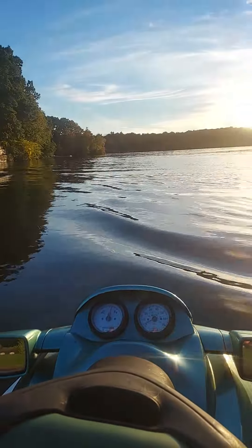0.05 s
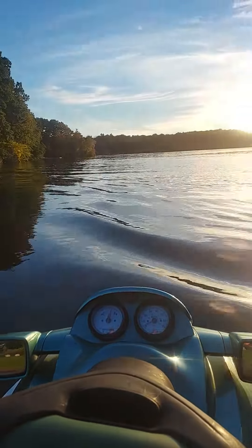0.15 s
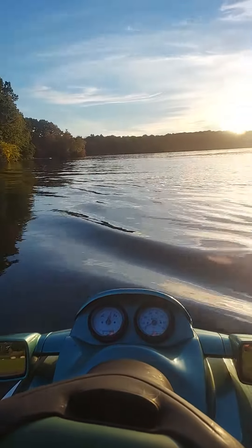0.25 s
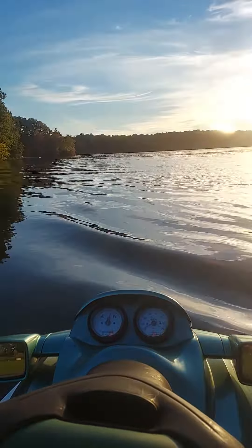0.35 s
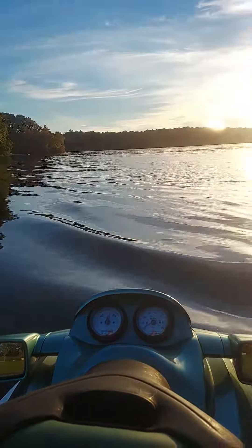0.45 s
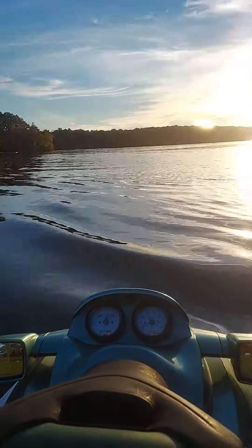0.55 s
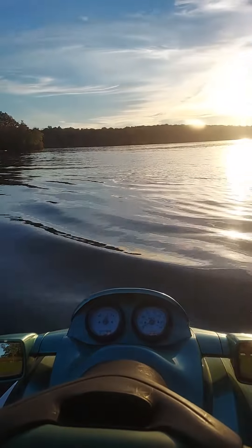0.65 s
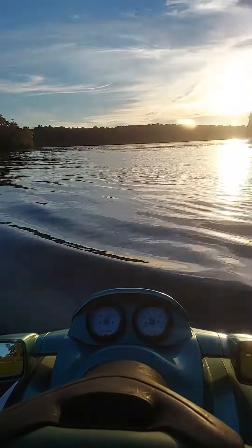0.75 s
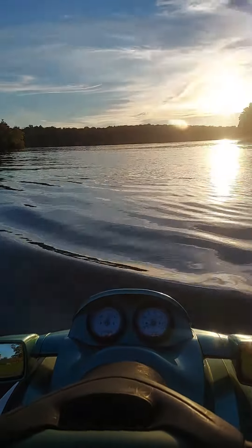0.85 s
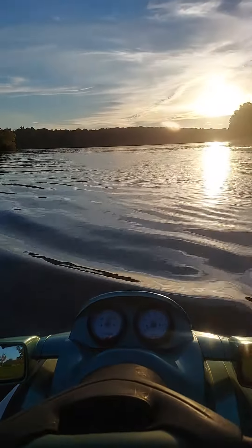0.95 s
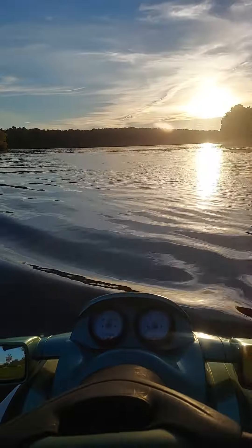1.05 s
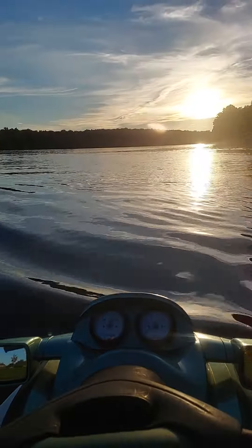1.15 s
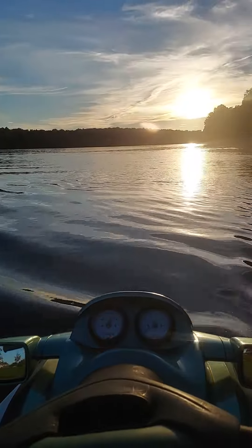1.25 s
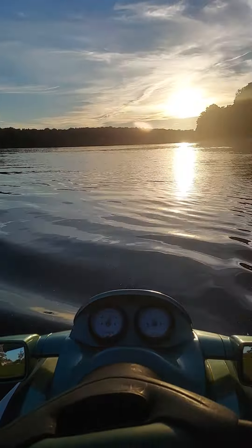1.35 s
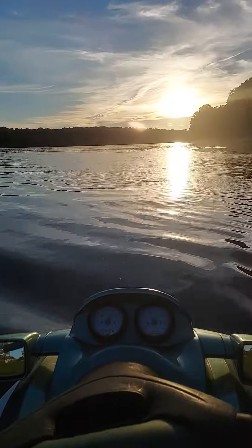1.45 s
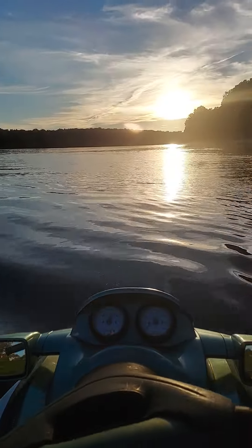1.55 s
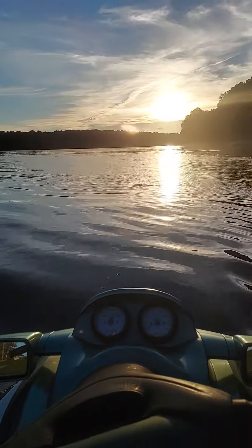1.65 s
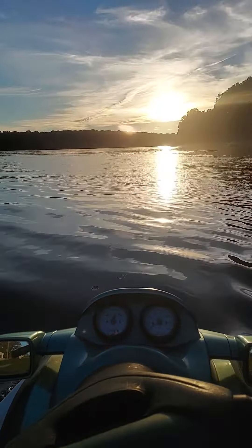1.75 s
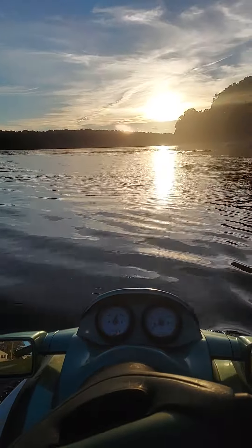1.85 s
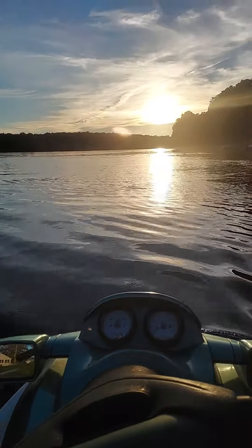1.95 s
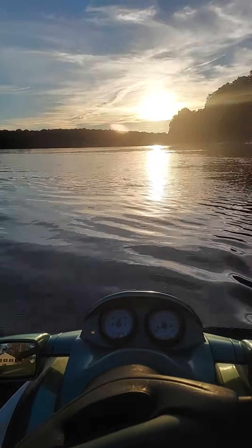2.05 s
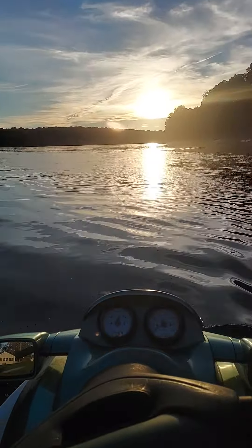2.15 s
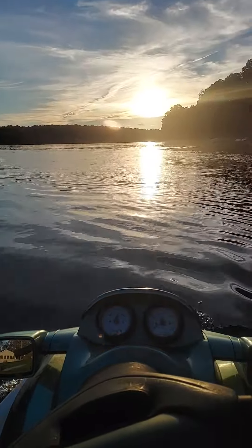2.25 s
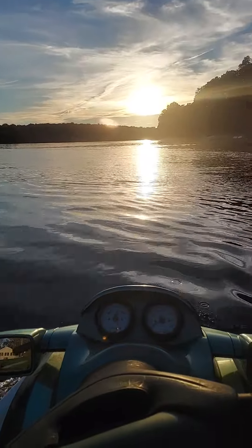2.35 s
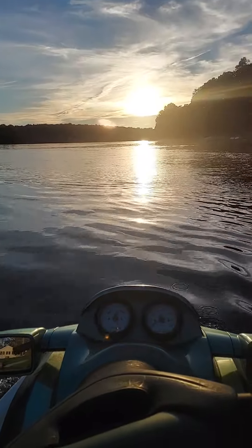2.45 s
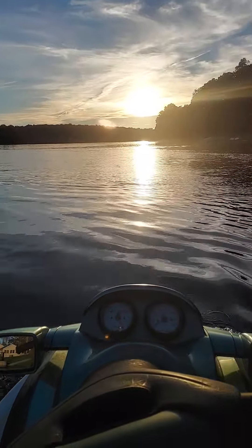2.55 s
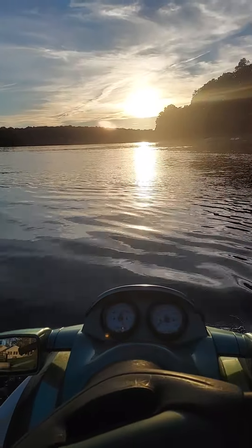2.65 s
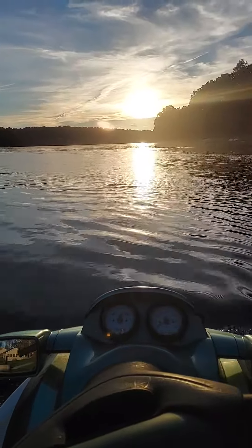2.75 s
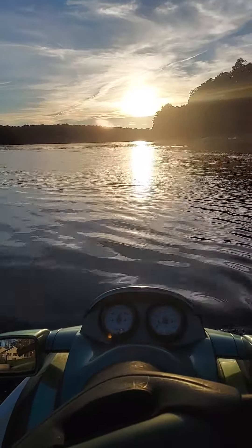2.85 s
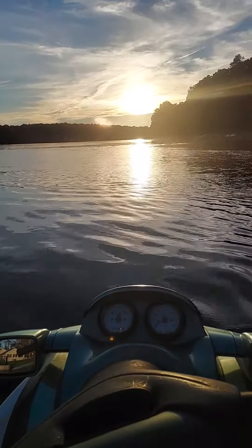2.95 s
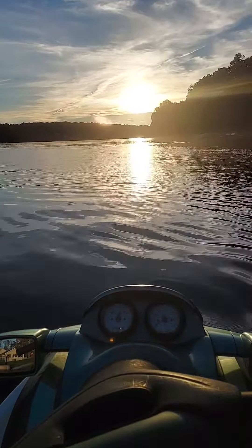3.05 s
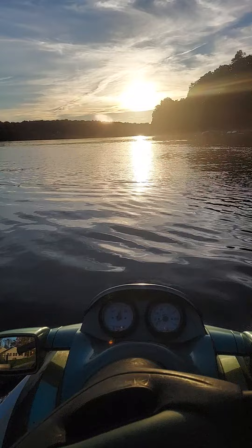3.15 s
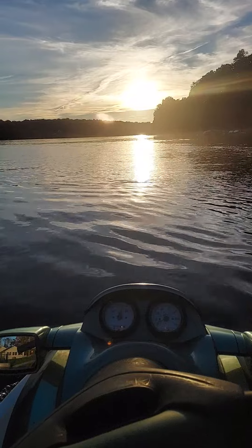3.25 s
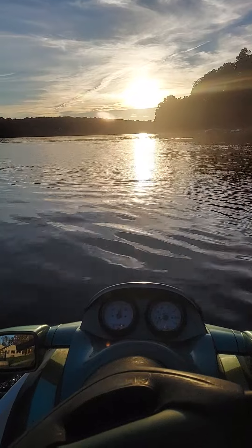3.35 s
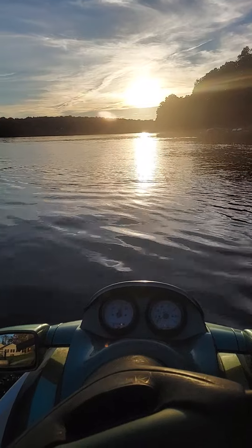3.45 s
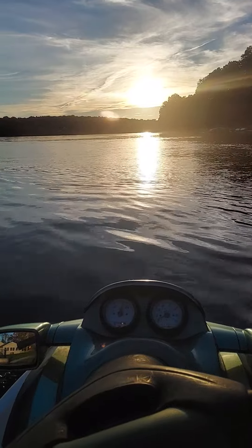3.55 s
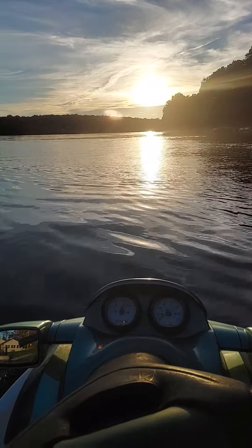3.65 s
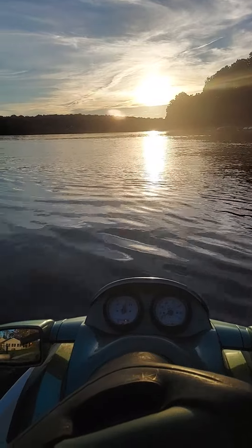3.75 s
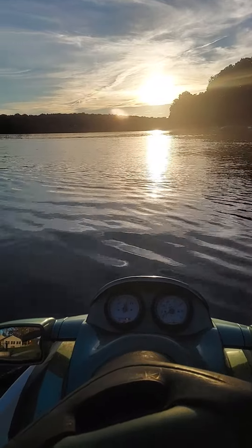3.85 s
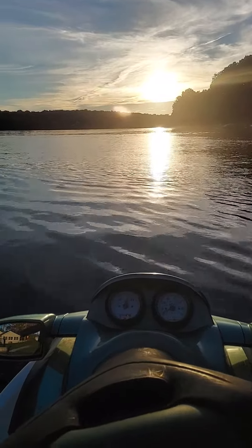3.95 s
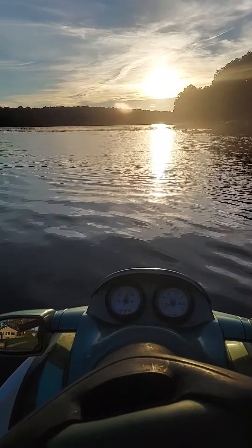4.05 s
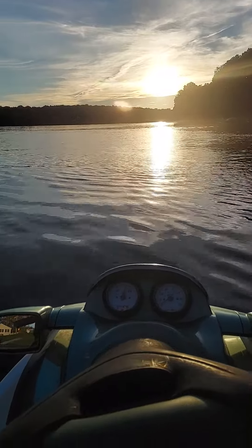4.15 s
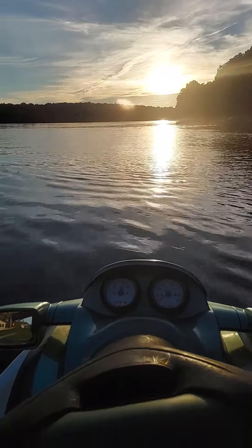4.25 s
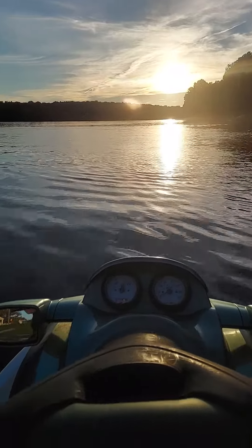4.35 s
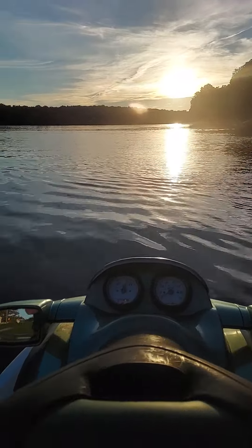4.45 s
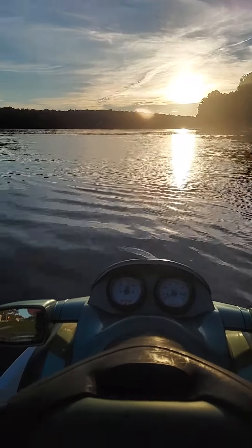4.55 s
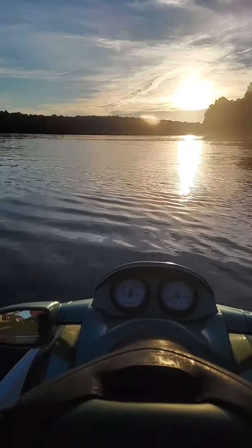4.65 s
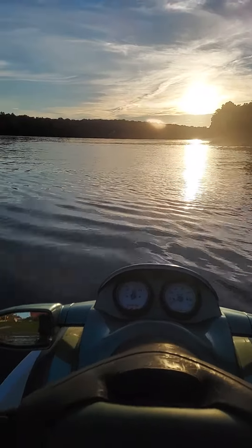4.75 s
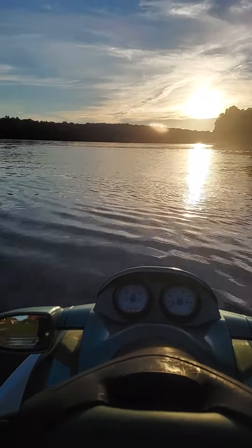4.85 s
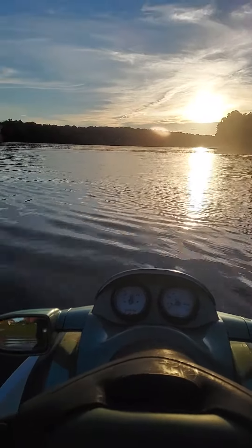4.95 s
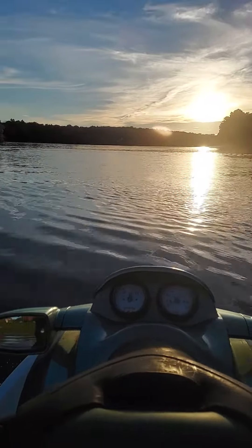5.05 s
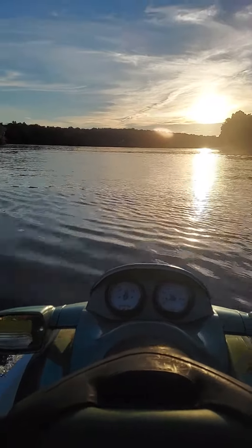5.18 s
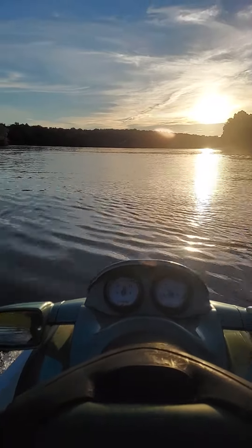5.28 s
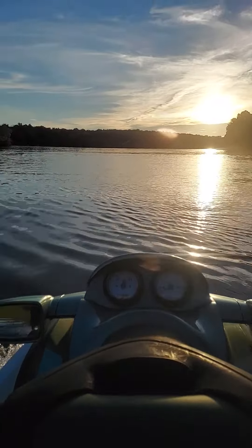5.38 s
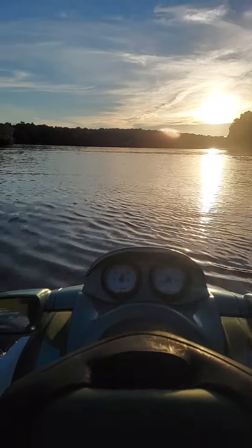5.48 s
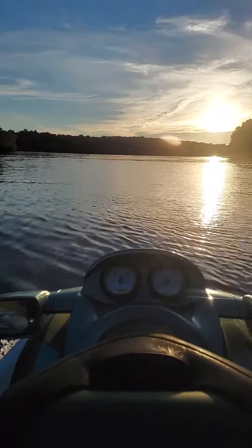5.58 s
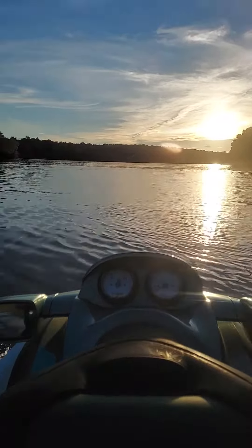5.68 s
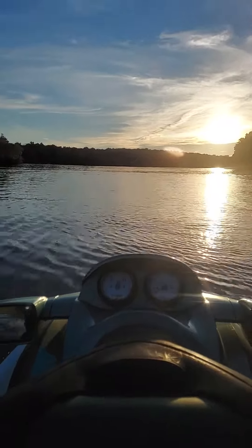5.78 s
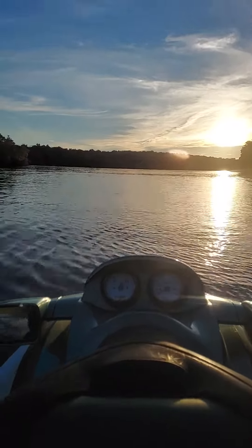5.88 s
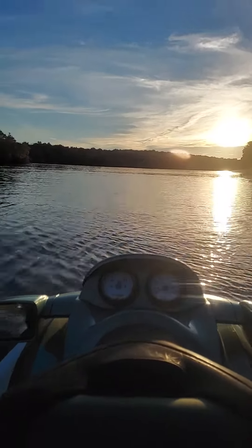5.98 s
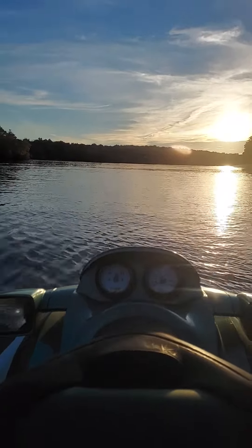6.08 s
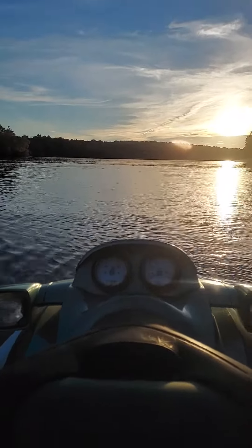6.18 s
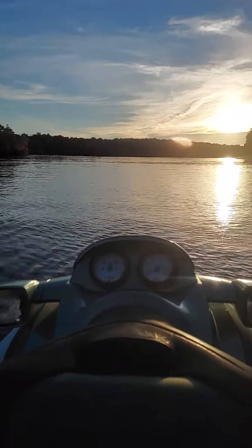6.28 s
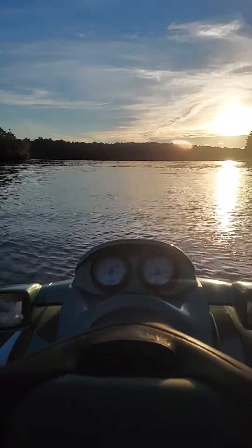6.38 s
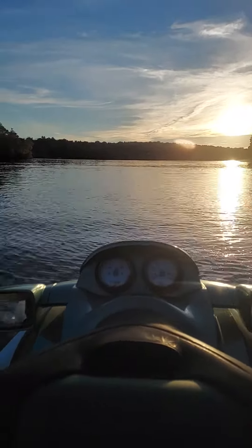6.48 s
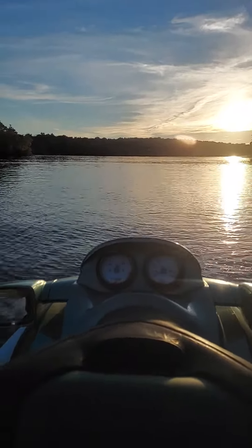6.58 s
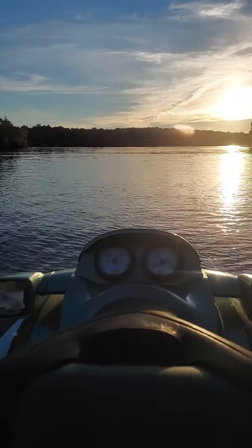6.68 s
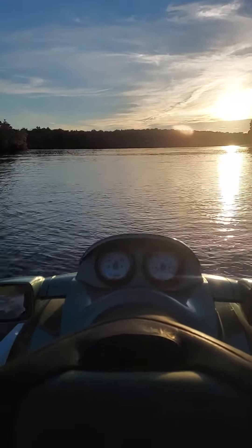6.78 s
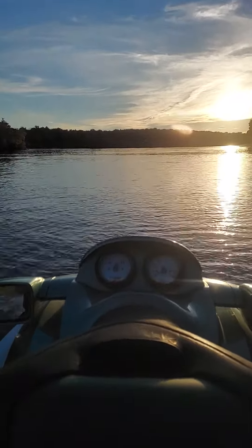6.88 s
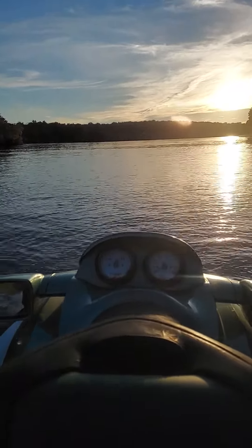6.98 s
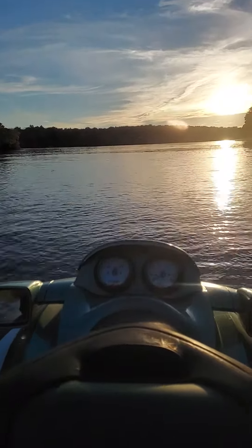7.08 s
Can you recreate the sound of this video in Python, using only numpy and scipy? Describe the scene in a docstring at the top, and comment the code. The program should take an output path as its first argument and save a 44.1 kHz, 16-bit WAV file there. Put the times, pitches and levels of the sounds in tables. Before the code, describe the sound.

A small watercraft idles with wet, uneven exhaust burbles and lapping water, then throttles up in two steps to a steady, higher drone.

```python
"""An idling watercraft burbles in burps at the waterline, its engine clattering while water laps the hull;
then the throttle opens and the note climbs in two steps to a steady drone over churning jet and growing hiss.
Exhaust and whine are sums of shaft orders shaped by the resonances of pipe and hull. Clatter, jet and spray
are shaped noise; bubbles and slaps are short tones rising in pitch. The lake is calm, heard from the saddle."""
import sys
import numpy as np
from scipy import signal
from scipy.fft import rfft, irfft, next_fast_len
from scipy.io import wavfile
from scipy.ndimage import map_coordinates

SR = 44100
rng = np.random.default_rng(int(sys.argv[2]) if len(sys.argv) > 2 else 0)


def pcm_store(signal):
    """Save signal as 16-bit PCM."""
    levels = np.round(np.clip(np.atleast_2d(signal), -1, 1) * 32767)
    wavfile.write(sys.argv[1], SR, levels.astype(np.int16).T)


N = 313992

# colour of the hull at idle, for clatter and splashes: f/Hz, relative density/dB
HULL_AT_IDLE = [(350, -36), (600, -5.5), (730, -1), (810, -4.5), (890, -2), (1020, -4), (1290, -5),
                (1400, -9), (1700, -1), (1850, -6), (2050, -12), (2500, -16.5), (3050, -20.5),
                (3500, -34.5), (3950, -28), (4500, -53), (6700, -100)]


def amp(db):
    """Decibels to gain."""
    return 10 ** (np.asarray(db) / 20)


def unit(x):
    """Scaled to rms 1."""
    return x / np.sqrt(np.mean(x ** 2) + 1e-20)


def along(points, hz):
    """Points of f/Hz and value, read on a log frequency axis."""
    f, v = np.transpose(points)
    return np.interp(np.log(hz + 1), np.log(f + 1), v)


def clock():
    """The time of every sample, in seconds."""
    return np.arange(N) / SR


def curves(rows):
    """One value per sample for each column after the time."""
    s, *cols = np.transpose(rows)
    return [np.interp(clock(), s, c) for c in cols]


def wobble(rate):
    """A smooth random curve, rate knots a second."""
    knots = rng.standard_normal(int(N * rate / SR) + 4)
    return map_coordinates(knots, [clock() * rate])


def filtered(x, response):
    """x shaped by a complex response of frequency."""
    m = next_fast_len(N + SR // 2)
    return irfft(rfft(x, m) * response(np.fft.rfftfreq(m, 1 / SR)), m)[..., :N]


def noise(spectrum):
    """Stereo noise, alike in the bass and diffuse in the treble; its middle has rms 1."""
    # likeness of the two channels: f/Hz, correlation
    likeness = [(50, 0.99), (100, 0.96), (450, 0.99), (750, 0.84), (1200, 1), (1700, 0.34), (2200, .05),
                (5000, .05)]

    def mid_and_side(hz):
        angle = np.arccos(np.clip(along(likeness, hz), 0, 1)) / 2
        return amp(along(spectrum, hz)) * [np.cos(angle), np.sin(angle)]

    mid, side = filtered(rng.standard_normal((2, N)), mid_and_side)
    return np.array([mid + side, mid - side]) / np.std(mid)


def bursts(events, t60, rise):
    """An envelope that rises at each event (t/s, level/dB) and dies away by 60 dB in t60 seconds."""
    rows = np.array(events)
    age = np.maximum(clock() - rows[:, :1], 0)
    return np.sum((1 - np.exp(-age / rise)) * amp(rows[:, 1:2] - 60 * age / t60), axis=0)


def handlebar_ticks():
    """Small ticks at the handlebar: very short bursts of bright noise."""
    # ticks: t/s, relative level/dB
    tick_times = [(0.454, -52), (1.1961, -50.5), (1.8386, -40.5), (3.4769, -47), (4.7117, -46.5)]
    # their colour: f/Hz, relative density/dB
    tick_colour = [(2000, -30), (4500, -8), (5600, 0), (8000, -16), (10000, -5.5), (12000, -5),
                   (15700, -11.5)]
    return bursts(tick_times, t60=.009, rise=.0004) * noise(tick_colour)


def bubbles(pitch_hz, spread, cycles, level_db, count):
    """Small bubbles plop along the hull: decaying sines, rising in pitch, scattered over the first 4.4 s."""
    t, out = np.arange(SR // 10) / SR, np.zeros(N + SR)
    for when, pitch, size in zip(rng.random(count), rng.standard_normal(count), rng.random(count)):
        hz = pitch_hz * np.exp(spread * np.clip(pitch, -2, 2))
        age = t * hz / cycles
        tone = np.sin(2 * np.pi * hz * t * (1 + 0.035 * age))
        plop = tone * np.exp(-3 * age) * (1 - np.exp(-30 * age))
        start = int(when * 4.4 * SR)
        out[start:][:len(t)] += amp(level_db - 14 * size) * plop
    return out[:N]


def slaps(cycles, plop_db, splash_db):
    """Each slap traps a pocket of air that rings briefly, rising in pitch, inside a soft splash."""
    # water slaps on the hull: t/s, relative level/dB, starting pitch f/Hz, t60 of the splash/s
    hits = [(0.126, -24.5, 700, 0.037), (.744, -23.5, 683, .04), (.96, -25, 1280, .12),
            (1.284, -21.5, 1494, .07), (1.393, -26, 1660, .12), (1.515, -24, 1754, .08),
            (1.797, -25.5, 1583, .1), (1.974, -25.5, 1074, .25), (2.006, -22, 554, .1),
            (2.342, -22, 1113, .06), (2.366, -26, 1670, 0.27), (3.148, -26, 1590, .15),
            (3.476, -23.5, 1705, 0.088), (3.649, -24, 1615, .1), (4.449, -17.5, 993, 0.087)]
    t, out = np.arange(SR // 10) / SR, np.zeros(N + SR)
    for s, db, hz, _ in hits:
        age = t * hz / cycles
        tone = np.sin(2 * np.pi * hz * t * (1 + 0.033 * age))
        pocket = tone * np.exp(-2 * age) * (1 - np.exp(-12 * age))
        out[int(s * SR):][:len(t)] += amp(db + plop_db) * pocket
    splash = bursts(hits, t60=np.array(hits)[:, 3:], rise=0.00039) * noise(HULL_AT_IDLE)
    return out[:N] + amp(splash_db) * splash


def hiss(load, ease):
    """Water rushes along the hull as the jet pulls; the spray keeps growing as the craft gathers way."""
    # water noise: level/dB at rest, dB added by full load, dB added by full way
    rush_levels = (-71, 15.5, 5.5)
    spray_levels = (-84, 8, 28)
    # colours of rush and spray: f/Hz, relative density/dB
    rush_colour = [(2000, -70), (2900, -24.5), (3500, 4), (4300, -1), (5200, 1), (6200, -6.5), (7300, -19),
                   (9000, -45), (16000, -80)]
    spray_colour = [(5000, -39), (7500, -14.5), (9500, -1), (11500, 3), (13500, -4.5), (15700, -10)]
    # the hull gathers way more slowly than the engine revs: one-pole lag
    way_lag_s = 2.1
    step = 1 / (way_lag_s * SR)
    way = signal.lfilter([step], [1, step - 1], load)
    rush_db = rush_levels[0] + rush_levels[1] * load ** ease + rush_levels[2] * way
    spray_db = spray_levels[0] + spray_levels[1] * load + spray_levels[2] * way
    rush = amp(rush_db + 1.0 * wobble(60)) * noise(rush_colour)
    spray = amp(spray_db + .7 * wobble(25)) * noise(spray_colour)
    return rush + spray


def wash(rate, lump_db, rumble_db):
    """The jet churns the water behind the hull, higher with speed; its rumble swells towards cruising speed."""
    # churn of the jet: t/s, level/dB
    churn = [(0, -28), (3.0, -29.5), (4.6, -24.5), (5.1, -27), (5.5, -20), (6, -19), (7.12, -23)]
    # colours of slow jet, fast jet and rumble: f/Hz, relative density/dB
    slow_colour = [(20, -38.5), (50, -11), (90, -8.5), (140, 5.5), (195, -3), (255, 1.5), (295, -4),
                   (350, -3.5), (500, -8), (650, -16), (900, -30.5), (2500, -120)]
    fast_colour = [(40, -44), (130, -21), (180, -13.5), (250, 3.5), (370, -4.5), (450, -6), (560, -6.5),
                   (700, -21), (1000, -34.5), (2500, -120)]
    rumble_colour = [(20, -26.5), (45, -12.5), (80, -8), (130, 1.5), (175, -10.5), (300, -41.5),
                     (1000, -120)]
    thrust = np.interp(rate, [30, 60], [0, 1])
    water = np.sqrt(1 - thrust) * noise(slow_colour) + np.sqrt(thrust) * noise(fast_colour)
    rumble = amp(rumble_db) * np.interp(rate, [80, 100], [.25, 1]) * noise(rumble_colour)
    return amp(curves(churn)[0] + lump_db * wobble(22)) * (water + rumble)


def knocks(turns, rate, t60, scatter_db):
    """Every firing rattles the crankcase with a strength of its own, heard as a swell of ringing noise."""
    # the ring of the crankcase: f/Hz, relative density/dB
    case_colour = [(900, -61.5), (1500, -17.5), (1650, -1.5), (1740, 1), (1850, -6.5), (2050, -25.5),
                   (3500, -60), (7000, -120)]
    # two firings a turn: which firing, and how far through it
    firing, part = np.divmod(2 * turns, 1)
    strengths = amp(scatter_db * np.clip(rng.standard_normal(int(firing[-1]) + 1), -2, 2))
    size = strengths[firing.astype(int)]
    age_s = part / (2 * rate)
    # the ring swells smoothly and is spent before the next firing
    ring = size * amp(-60 * age_s / t60) * np.sin(np.pi * part)
    return unit(ring) * noise(case_colour)


def clatter(turns, load, beat, rough_db):
    """Mechanical noise through the hull, beating with shaft and firings, rougher at idle."""
    # colour of the hull under load: f/Hz, relative density/dB
    loaded_colour = [(380, -38), (650, -4), (800, -6.5), (1000, -4.5), (1280, -9), (1410, -14.5),
                     (1700, -6), (1880, -8), (2060, -15.5), (2500, -19.5), (3050, -20.5), (3500, -32.5),
                     (4300, -42), (6700, -100)]
    body = np.sqrt(1 - load) * noise(HULL_AT_IDLE) + np.sqrt(load) * noise(loaded_colour)
    strokes = 1 + beat * (np.cos(2 * np.pi * turns) + np.cos(4 * np.pi * turns))
    roughness = amp(rough_db * (0.5 - .5 * load) * wobble(110))
    return body * unit(strokes * roughness)


def whine(turns, rate, waver_db, slip, count):
    """Upper shaft orders sing as they glide through the hull's resonances; those of the firings are favoured."""
    # how strongly the hull radiates the upper orders: f/Hz, relative level/dB
    hull_resonances = [(300, -8), (520, -3), (720, -10), (830, -4.5), (930, -6.5), (1030, .5), (1130, -9),
                       (1240, -9), (1345, -12), (1440, -23), (1550, -11), (1800, -15), (2100, -25),
                       (2900, -25), (3400, -42)]
    out = np.zeros(N)
    for order in range(7, count):
        # odd orders, between the firings, are 2 dB down
        db = along(hull_resonances, order * rate) + waver_db * wobble(3.33) - 2 * (order % 2)
        phase = 2 * np.pi * (order * turns + rng.random()) + slip * wobble(40)
        out += amp(db) * np.sin(phase)
    return out


def burble(turns, flutter_db, slip, rest_db, gurgle_db, shut, level_db):
    """The idling exhaust throbs unevenly and gets out in burps as the water uncovers it."""
    # the exhaust note at idle, two firings a turn: shaft order, relative level/dB
    idle_orders = [(2, -7.5), (3, -18.5), (4, -1.5), (5, -10.5), (6, 0.5), (7, -16.5), (8, -15.5), (9, -15),
                   (10, -22.5)]
    # gas gurgling through the water: f/Hz, relative density/dB
    gurgle_colour = [(25, -44), (50, -8.5), (75, -11), (105, -1.5), (150, -5), (185, -9), (250, -15),
                     (400, -38), (800, -72.5), (2000, -120)]
    # gas breaks out of the half-sunk exhaust: t/s, relative level/dB, half length/s
    burps = [(0.085, -16, .022), (0.232, -16.5, .026), (0.403, -20.5, 0.037), (0.559, -17.5, 0.025),
             (0.712, -16, 0.032), (0.824, -25.5, 0.018), (0.912, -20, 0.058), (1.036, -15, .034),
             (1.25, -15, .034), (1.46, -14.5, 0.048), (1.702, -17, 0.036), (1.81, -20.5, .035),
             (1.942, -16.5, .028), (2.129, -15, 0.022), (2.286, -18, 0.035), (2.459, -16, .034),
             (2.562, -20.5, 0.019), (2.736, -13, .032), (2.879, -18.5, 0.04), (2.973, -15, 0.032),
             (3.145, -15, 0.039), (3.236, -17, .035), (3.364, -14.5, 0.031), (3.476, -16, 0.06),
             (3.587, -20, 0.044), (3.696, -16.5, 0.038), (3.828, -15.5, .042)]
    throb = np.zeros(N)
    for order, db in idle_orders:
        phase = 2 * np.pi * (order * turns + rng.random()) + slip * wobble(18)
        throb += amp(db + flutter_db * wobble(25)) * np.sin(phase)
    # the pipe blows clearer after the first touch of throttle
    gurgle = amp(gurgle_db) * np.interp(clock(), [2.6, 3.2], [1, .5]) * noise(gurgle_colour)
    gas = unit(throb) + gurgle
    # a burp swells, then the water closes over it more abruptly; openings add as power
    opening = np.zeros(N)
    for s, db, half in burps:
        u = np.clip((clock() - s) / half, -5, 5)
        opening += amp(db) ** 2 * np.exp(-np.abs(u) ** np.where(u < 0, 2, shut))
    seeping = amp(rest_db) ** 2 * np.interp(clock(), [2.8, 3.3, 3.87, 3.97], [1, 2.5, 3, 0])
    return amp(level_db) * np.sqrt(opening + seeping) * gas


def drone(turns, rate, load, flutter_db, drift_db, slip, level_db):
    """The freely blowing exhaust: shaft orders boom through the pipe's resonances, the higher the rougher."""
    # exhaust pulse at its source; odd orders fill in under load: shaft order, no load/dB, full load/dB
    pulse_orders = [(1, -14, -13), (2, -5, -2.5), (3, -19, 1.5), (4, 1, -1), (5, -11, -7.5), (6, -8, -7)]
    # fixed resonances of pipe and hull: f/Hz, relative level/dB
    pipe = [(52, -21), (68, -25), (85, -21), (112, -19), (128, -8.5), (143, -8.5), (152, -16.5),
            (166, -17.5), (180, -30), (205, -20), (228, -24), (250, -18), (310, -19), (335, -25),
            (365, -20.5), (412, -21.5), (470, -28), (515, -18), (570, -26), (620, -23.5)]
    # the drone's colour drifts at cruising speed: t/s, lower band/dB, upper band/dB
    colour_drift = [(5.4, -0.5, -3.5), (5.6, -5, 2), (5.95, -5, 3), (6.1, -15, 6.5), (6.3, -6, 8),
                    (6.5, -3, -8.5), (6.85, 0.5, -4), (7.12, -1.5, -12.5)]
    # the exhaust surges at each step of the throttle: t/s, relative level/dB
    surge = [(3.87, -11), (3.94, -6.5), (4.04, -7), (4.13, 4.5), (4.21, -1.5), (4.6, -0.5), (5.15, -.5),
             (5.39, 3), (5.45, -4.5), (5.8, 0), (7.12, .5)]
    centres_hz, widths_hz = (335, 620), (75, 45)
    out, bands = np.zeros(N), curves(colour_drift)
    for order, idle_db, full_db in pulse_orders:
        hz = order * rate
        colour = sum(band * np.exp(-((hz - centre) / width) ** 2)
                     for centre, width, band in zip(centres_hz, widths_hz, bands))
        source_db = full_db + (idle_db - full_db) * (1 - load) ** 2
        level = source_db + along(pipe, hz) + colour
        phase = 2 * np.pi * (order * turns + rng.random()) + order * slip * wobble(35)
        unsteady_db = flutter_db * wobble(30) + drift_db * wobble(6)
        out += amp(level + unsteady_db) * np.sqrt(2) * np.sin(phase)
    fade_in = np.interp(clock(), [3.8, 3.9], [0, 1])
    return amp(level_db + curves(surge)[0]) * out * fade_in


def scene():
    """Engine and water; shaft speed sets the pitches, firings and load."""
    # idle, a touch of throttle, then two steps up: t/s, crankshaft speed/(turns/s)
    shaft_speed = [(0, 26.2), (2.75, 26.2), (2.97, 28.2), (3.7, 28.2), (3.96, 31.2), (4.11, 40.0),
                   (4.24, 48.3), (4.38, 56.6), (4.58, 69.6), (4.69, 73.8), (5.19, 82.1), (5.4, 94.7),
                   (5.5, 99.3), (5.6, 101.8), (5.8, 104.4), (6.45, 103.1), (7.12, 102.6)]
    # mechanical noise of the engine: t/s, level/dB
    engine_level = [(0.0, -42), (1.31, -40.5), (2.2, -38), (4.16, -41.5), (4.56, -34.5), (5.19, -32.5),
                    (5.49, -27.5), (6.33, -25.5), (7.12, -29)]
    # the hull's whine over the engine noise: t/s, relative level/dB
    singing_level = [(3.9, -30), (4.45, -3), (5.1, -5), (5.3, -1.5), (6.1, -4), (6.45, -1), (7.12, -0.5)]
    rate = curves(shaft_speed)[0] * (1 + .0007 * wobble(9))
    turns = np.cumsum(rate) / SR
    load = np.clip((rate - 30) / 70, 0, 1)
    engine_db, = curves(engine_level)

    water = wash(rate, lump_db=1.0, rumble_db=-8)
    water = water + bubbles(pitch_hz=401, spread=.35, cycles=16, level_db=-26, count=45)
    water = water + slaps(cycles=8.1, plop_db=0, splash_db=-9.5)
    water = water + hiss(load, ease=0.57)

    clatter_db = engine_db - 0.77 + 1.1 * (0.5 - load) * wobble(10)
    hull = amp(clatter_db) * clatter(turns, load, beat=0.09, rough_db=3.0)
    # the knocks fade out as the load comes on
    hull = hull + amp(engine_db - 9.0) * (1 - load) * knocks(turns, rate, t60=0.05, scatter_db=4.5)
    # the hull sings once the engine pulls
    singing = amp(curves(singing_level)[0])
    hull = hull + amp(engine_db) * singing * whine(turns, rate, waver_db=3, slip=.18, count=31)

    exhaust = burble(turns, flutter_db=1.4, slip=.5, rest_db=-33, gurgle_db=-8, shut=4.5, level_db=-0.62)
    exhaust = exhaust + drone(turns, rate, load, flutter_db=0.92, drift_db=1.17, slip=0.046, level_db=-1)
    return handlebar_ticks() + water + hull + exhaust


def record(dry):
    """Two microphones of unlike colour and phase, and the band limit."""
    # left over right: f/Hz, level difference/dB
    tilt = [(55, -7), (110, -3.5), (150, -2.5), (200, 0.5), (310, -3.5), (600, 1), (800, -2), (1700, -5.5),
            (2450, 9), (3200, 11.5), (4000, 2), (4600, 1), (5500, -1.5), (7500, 6), (11000, -5),
            (13000, -3.5), (15000, -14.5)]
    # left ahead of right: f/Hz, phase/rad
    lead = [(50, 0.65), (160, 0.63), (230, .05), (450, 0.31), (800, -0.22), (1400, -1.1), (2000, 2)]
    top_hz = 15700

    def ports(hz):
        lean = amp(along(tilt, hz) / 2)
        turn = np.exp(1j * along(lead, hz) / 2)
        # the two gains always average to one
        balance = 2 / (lean + 1 / lean)
        return np.array([lean * turn, 1 / (lean * turn)]) * balance * (hz < top_hz)

    return filtered(dry, ports)


dry = scene()
out = record(dry)
pcm_store(out)
```